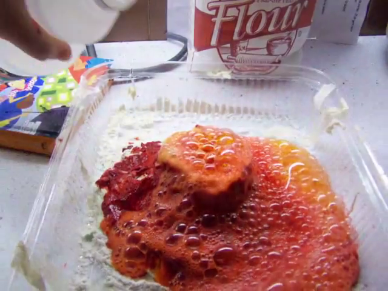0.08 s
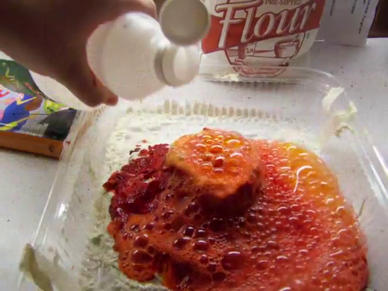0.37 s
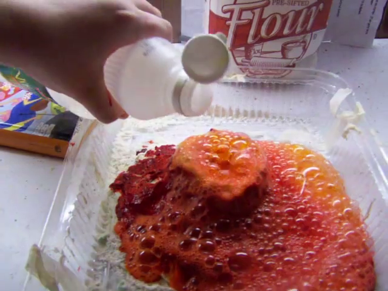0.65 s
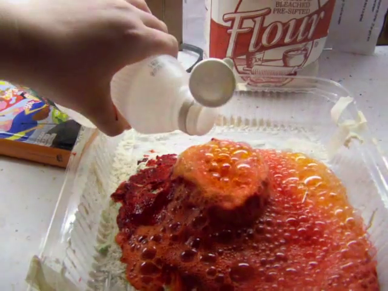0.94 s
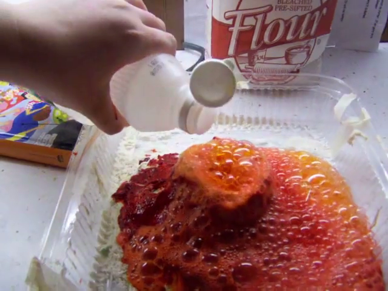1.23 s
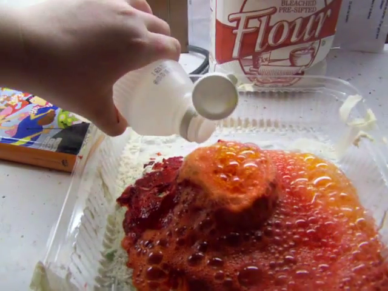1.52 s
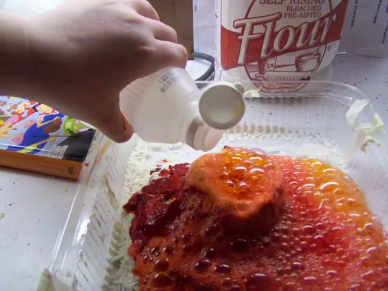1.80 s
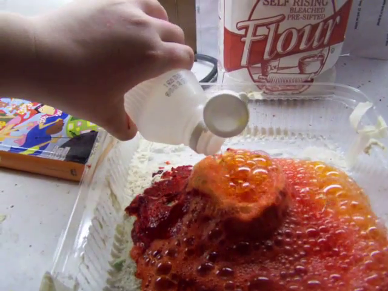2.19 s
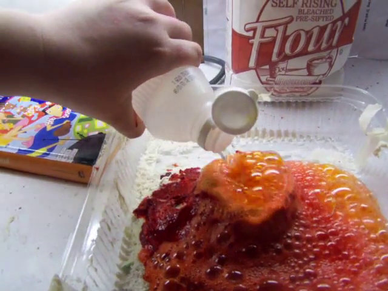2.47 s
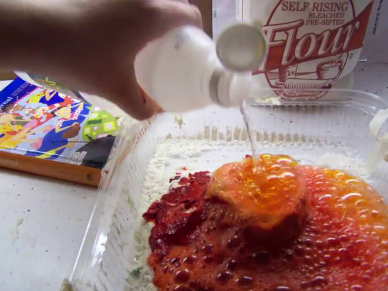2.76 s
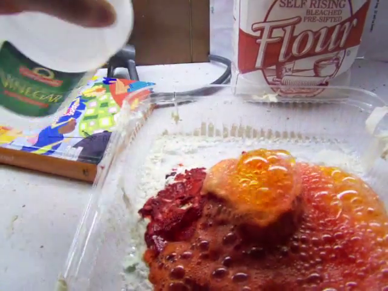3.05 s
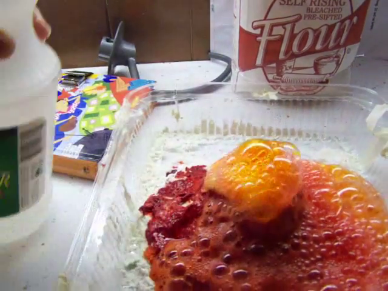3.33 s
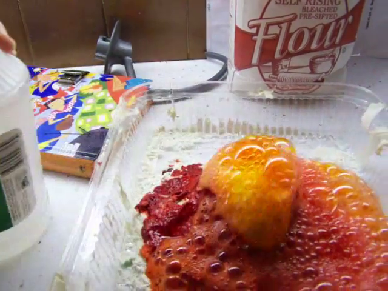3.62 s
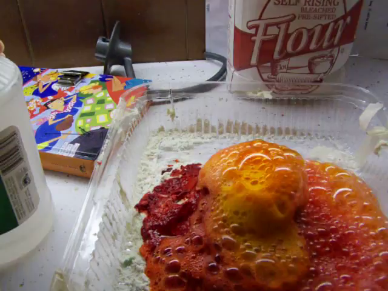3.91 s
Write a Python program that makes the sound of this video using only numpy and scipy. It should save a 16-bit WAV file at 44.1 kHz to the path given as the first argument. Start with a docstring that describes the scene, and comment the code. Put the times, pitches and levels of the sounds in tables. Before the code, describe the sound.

Liquid spatters in short spurts onto foam that fizzes softly, with a few bubbles popping. A plastic bottle then crackles and thumps onto a table, and the fizz grows louder. A small room hums and hisses throughout.

```python
"""Vinegar poured on foam

Vinegar from a plastic bottle spatters in spurts onto a foaming heap in a tray; bubbles fizz and pop.
The bottle's wall snaps as it is turned upright, it thumps onto the table and its base skids briefly.
Then the wetted foam fizzes up. A small room hums and hisses throughout."""
import sys
import numpy as np
from scipy import signal
from scipy.fft import rfft, irfft
from scipy.io import wavfile

SR = 44100
rng = np.random.default_rng(int(sys.argv[2]) if len(sys.argv) > 2 else 0)


def master(y):
    """Save y as 16-bit WAV."""
    cut = np.clip(np.atleast_2d(y).T, -1, 1)
    pcm = np.round(cut * 32767)  # scale
    wavfile.write(sys.argv[1], SR, pcm.astype(np.int16))


N = 176400

# liquid landing on the foam: t/s, level/dB, rise/s, t60/s
SPURTS = [(.526, -33, 0.017, 0.39), (0.614, -42, 0.0076, 0.19), (.71, -39.5, 0.014, 0.86),
          (.751, -32, 0.002, 0.28), (.98, -40.5, 0.033, 0.5), (1.235, -35.5, 0.04, 0.88)]
# spectrum of droplets and clicks: f/Hz, level/dB
SPATTER_SPECTRUM = [(240, -39.5), (400, -19.5), (498, -16.5), (770, -7), (1320, -11), (1680, -4.5),
                    (2290, -11.5), (2570, -3.5), (3410, -2.5), (7000, -19), (8600, -35.5), (11200, -69.5),
                    (18900, -120)]
# ringing of the thin stream: t/s, length/s, f/Hz, width/Hz, level/dB
STREAM_NOTES = [(1.4, 0.44, 1540, 220, -53), (2.334, 0.47, 1656, 220, -49.5)]
# foam activity: t/s, level/dB
FOAM_ENVELOPE = [(0, -40), (.3, -44.5), (.9, -49.5), (1.6, -47.5), (1.95, -46), (2.3, -50.5), (2.7, -47),
                 (3.1, -45.5), (3.62, -38.5), (3.68, -37.5), (3.74, -30.5), (3.86, -33.5), (4, -33)]
# spectrum of bursting foam: f/Hz, level/dB
FIZZ_SPECTRUM = [(700, -20), (1100, -22), (1600, -16.5), (2400, -12), (3300, -9), (3900, -2.5), (4500, -4),
                 (5200, -8), (6300, -17), (7500, -18), (8600, -32)]
# single bubbles: t/s, level/dB, f/Hz, t60/s, relative click/dB
BUBBLE_POPS = [(.5428, -16.5, 3730, 0.015, -6), (.5535, -33, 3030, .02, -6),
               (.5665, -21.5, 4560, 0.013, -6), (.6268, -30.5, 6460, 0.0097, -4),
               (.7555, -29.5, 1790, 0.044, 0), (1.7385, -23, 3960, .008, 0), (1.740, -31, 1440, .012, -8),
               (1.955, -31, 2760, 0.017, -3), (2.023, -28.5, 3510, 0.032, -5)]
# bottle wall snaps: t/s, level/dB, f/Hz, t60/s, relative click/dB
WALL_SNAPS = [(3.0645, -28, 920, 0.018, -3), (3.0684, -23.5, 3690, 0.025, 5),
              (3.0765, -28.5, 6100, 0.018, -14), (3.1293, -2.5, 3150, .009, -18),
              (3.1337, -25.5, 3090, 0.066, -18), (3.14, -23, 4700, 0.023, -25),
              (3.191, -26, 3970, 0.017, -14), (3.2218, -19.5, 4450, 0.03, 0), (3.28, -27, 2270, 0.032, -25),
              (3.3715, -16.5, 3160, 0.013, -14), (3.3744, -9, 3440, 0.019, -28),
              (3.418, -29.5, 4700, 0.036, 4), (3.553, -27.5, 3730, 0.066, -1),
              (3.568, -15.5, 3800, 0.0046, -12)]
# two modes of a small wall or bubble: frequency ratio, level/dB
PING_MODES = [(0.969, -0.5), (1.1, -4.5)]
# bottle shell: f/Hz, width/Hz, level re snap/dB, t60/s
SHELL_MODES = [(770, 70, -51, 0.48), (1150, 57, -42, 0.17), (1550, 240, -41.5, 0.75),
               (3290, 120, -23, 0.091)]
# bottle meets table, rim then flat base: t/s, level/dB
CONTACTS = [(3.4957, 0), (3.5021, -9)]
# table top: f/Hz, level/dB, t60/s
TABLE_MODES = [(71.5, -28, 0.27), (90.5, -5.5, 0.19), (131.7, -11, .2), (168.2, -16.5, 0.27),
               (256, -29, 0.14), (395, -28, 0.072), (507, -26.5, 0.11), (653, -25, 0.11),
               (755, -26.5, 0.089), (834, -20.5, 0.073), (1092, -36, 0.41), (1680, -40, 0.16),
               (2080, -36, 0.21)]
# spectrum of the plastic knock: f/Hz, level/dB
KNOCK_SPECTRUM = [(180, -47), (300, -12), (438, -1), (769, 4), (1080, -10), (2020, -5), (2720, -16.5),
                  (3550, -1.5), (6970, -19.5), (8600, -38), (11200, -82), (18900, -120)]
# jerks of the skidding base: t/s, length/s, level/dB, low-pass/Hz
SKID_JERKS = [(3.5823, .004, -16.5, 4230), (3.59, 0.0053, -19.5, 6000), (3.598, 0.007, -17.5, 3240)]
# bottle base: f/Hz, level/dB, t60/s
BASE_MODES = [(870, -12, .02), (1510, -4.5, 0.028), (2210, -3, 0.032), (2370, 9.5, 0.026),
              (2800, -1, 0.027), (3630, 5.5, 0.018), (4400, -12, 0.012), (4560, 8, 0.015),
              (5250, -25, .012), (6840, 3, .008)]
# spectrum of the rub: f/Hz, level/dB
GRIT_SPECTRUM = [(120, -38), (200, -22), (439, -32), (693, -7), (1110, -14), (2440, 3.5), (3290, -5),
                 (4960, -1.5), (7350, -21.5), (8600, -27), (11200, -64), (18900, -120)]
# spectrum of room noise: f/Hz, level/dB
ROOM_SPECTRUM = [(30, -4.5), (50, -4), (75, -9), (120, -2.5), (180, -3), (300, -6.5), (400, -10),
                 (500, -15.5), (750, -16), (1250, -17.5), (1600, -15.5), (2100, -17.5), (3000, -13),
                 (4200, -10.5), (5600, -17.5), (7250, -21.5), (8000, -26), (8600, -35)]
# hum resonances: f/Hz, width/Hz, level/dB
HUM_PEAKS = [(169, 9.7, -51), (198.5, 9.7, -54.5), (253, 21, -55.5), (359.2, 9.3, -55), (415, 7.7, -58.5)]
# hiss resonances: f/Hz, width/Hz, level/dB
HISS_PEAKS = [(847, 50, -65.5), (1223, 37, -66), (1643, 110, -67.5), (2930, 490, -67), (3418, 110, -53),
              (3720, 290, -55), (4100, 260, -52.5), (4800, 350, -56), (6310, 230, -63)]

TOP_HZ = 8850


def pouring(drops_per_s=8000):
    """Each spurt is a droplet shower that swells and dies; the stream adds a faint hollow note."""
    t = clock()
    flow = sum(amp(db) * np.clip((t - at_s) / rise_s, 0, 1) * fade(t - at_s - rise_s, t60_s)
               for at_s, db, rise_s, t60_s in SPURTS)
    out = flow * colour(crackle(drops_per_s, spread_db=2), SPATTER_SPECTRUM)
    for at_s, length_s, hz, width_hz, db in STREAM_NOTES:
        swell = np.sin(np.pi * np.clip((t - at_s) / length_s, 0, 1))
        out += amp(db) * swell * resonance(hz, width_hz)
    return out


def foam(bursts_per_s=10000):
    """Tiny bubbles burst, louder as the reaction picks up."""
    level_db = np.interp(clock(), *np.array(FOAM_ENVELOPE).T)
    return amp(level_db) * colour(crackle(bursts_per_s, spread_db=2.3), FIZZ_SPECTRUM)


def bubble_pops():
    """Single bubbles pop with a click and a ping."""
    return ticks(BUBBLE_POPS)


def bottle_wall():
    """The thin wall snaps as the grip shifts; the shell rings on faintly."""
    out, t = ticks(WALL_SNAPS), clock()
    for hz, width_hz, ring_db, t60_s in SHELL_MODES:
        energy = sum((t > at_s) * (amp(db) * fade(t - at_s, t60_s)) ** 2 for at_s, db, *_ in WALL_SNAPS)
        out += amp(ring_db) * np.sqrt(energy) * resonance(hz, width_hz)
    return out


def bottle_landing(push_s=0.0025, knock_db=-10.5, rattle_db=-28):
    """Each contact pushes the table top down with a plastic knock; things on it rattle faintly."""
    out, t, table = np.zeros(N), clock(), ring(TABLE_MODES, SR // 2)
    push = np.minimum(t / push_s, 1)
    thump = -passband(table * push[:len(table)], 63, TOP_HZ, order=3)  # little deep bass radiates
    knock = amp(knock_db) * fade(t, t60_s=0.028)
    rattle = amp(rattle_db) * fade(t, t60_s=0.21)
    for at_s, db in CONTACTS:
        noise = colour(rng.standard_normal(N), KNOCK_SPECTRUM)
        add(out, at_s, amp(db) * thump)
        add(out, at_s, amp(db) * push * (knock + rattle) * noise)
    return out


def bottle_skid(slip_hz=900, jitter=0.55, grit_db=-4, size=4096):
    """Uneven stick-slip pulses ring the base, over a gritty rub."""
    out, t, base = np.zeros(N), clock()[:size], ring(BASE_MODES, size)
    for at_s, length_s, db, lowpass_hz in SKID_JERKS:
        gaps_s = np.exp(jitter * rng.standard_normal(32)) / slip_hz
        times_s = np.cumsum(gaps_s) - gaps_s[0]
        slips = np.zeros(size)
        slips[(times_s[times_s < length_s] * SR).astype(int)] = 1
        rasp = signal.fftconvolve(slips, base)[:size]
        rasp = signal.sosfilt(signal.butter(1, lowpass_hz, fs=SR, output="sos"), rasp)
        rasp *= np.sqrt(length_s * SR / np.sum(rasp ** 2))
        grit = colour(rng.standard_normal(size), GRIT_SPECTRUM) * fade(t - length_s, t60_s=0.0095)
        add(out, at_s, amp(db) * (rasp + amp(grit_db) * grit))
    return out


def reflections(x, level_db=-11.5, t60_s=0.041, delay_s=0.002):
    """Quick echoes off table and walls."""
    t = clock()[:SR // 2]
    tail = rng.standard_normal(len(t)) * fade(t, t60_s) * (t > delay_s)
    return amp(level_db) * signal.fftconvolve(x, tail / np.linalg.norm(tail))[:N]


def room(level_db=-41.5, waver_db=0.22):
    """Near-steady rumble and hiss with narrow resonances."""
    waver = resonance(hz=3.2, width_hz=12)
    noise = colour(rng.standard_normal(N), ROOM_SPECTRUM) * amp(level_db + waver_db * waver)
    return noise + sum(amp(db) * resonance(hz, width_hz) for hz, width_hz, db in HUM_PEAKS + HISS_PEAKS)


def ticks(rows, rise_s=0.00029, band_ratio=3.1, size=4096):
    """Short two-mode pings, each opened by a broad click."""
    out, t = np.zeros(N), clock()[:size]
    for at_s, db, hz, t60_s, click_db in rows:
        ping = ring([(hz * ratio, mode_db, t60_s) for ratio, mode_db in PING_MODES], size)
        ping = passband(ping * np.minimum(t / rise_s, 1), hz / band_ratio, hz * band_ratio)
        click = 0.5 * colour(rng.standard_normal(size), SPATTER_SPECTRUM) * fade(t, t60_s=0.011)
        add(out, at_s, amp(db) * (ping + amp(click_db) * click))
    return out


def crackle(per_s, spread_db):
    """Random impulses, most weak, a few strong."""
    hits = rng.random(N) < per_s / SR
    signs = rng.choice([-1, 1], N)
    return hits * signs * amp(spread_db * np.minimum(rng.exponential(size=N), 6))


def ring(modes, size):
    """Sum of decaying sines."""
    t = clock()[:size]
    return sum(amp(db) * np.sin(2 * np.pi * hz * t) * fade(t, t60_s) for hz, db, t60_s in modes)


def resonance(hz, width_hz):
    """Noise in one resonance; rms 1."""
    f = np.fft.rfftfreq(N, 1 / SR)
    return unit(irfft(rfft(rng.standard_normal(N)) / (1 + (2 * (f - hz) / width_hz) ** 2), N))


def colour(x, spectrum):
    """Shape by a spectrum, falling off beyond its ends; rms 1."""
    hz, db = np.array(spectrum).T
    f = np.maximum(np.fft.rfftfreq(len(x), 1 / SR), 1)
    gain = amp(np.interp(np.log(f), np.log(hz), db))
    skirts = np.minimum(f / hz[0], 1) ** 2 * np.minimum(hz[-1] / f, 1) ** 10
    return unit(irfft(rfft(x) * skirts * gain, len(x)))


def passband(x, low_hz, high_hz, order=2):
    """Band-pass filter."""
    edges_hz = [low_hz, min(high_hz, SR / 2 - 1)]
    return signal.sosfilt(signal.butter(order, edges_hz, "band", fs=SR, output="sos"), x)


def fade(t, t60_s):
    """1 until t = 0, then down 60 dB per t60_s."""
    return np.exp(-np.log(1000) * np.maximum(t, 0) / t60_s)


def amp(db):
    """dB to gain."""
    return 10 ** (np.asarray(db) / 20)


def unit(x):
    """Scale to rms 1."""
    return x / np.sqrt(np.mean(x ** 2) + 1e-20)


def clock():
    """Sample times in s."""
    return np.arange(N) / SR


def add(out, at_s, x):
    """Mix x in at at_s."""
    i = int(at_s * SR)
    out[i:i + len(x)] += x[:N - i]


def scene():
    """Pops, snaps and skid with reflections, plus landing, pour, foam and room; mono."""
    near = bubble_pops() + bottle_wall() + bottle_skid()
    return (near + reflections(near) + bottle_landing() + pouring() + foam() + room())[None]


def record(dry, rolloff_hz=7930):
    """Small microphone: treble roll-off, then a steep cut."""
    f = np.fft.rfftfreq(N, 1 / SR)
    soft = irfft(rfft(dry) / np.sqrt(1 + (f / rolloff_hz) ** 20), N)
    return signal.sosfilt(signal.ellip(10, 0.2, 80, TOP_HZ, fs=SR, output="sos"), soft)


dry = scene()
out = record(dry)
master(out)
```